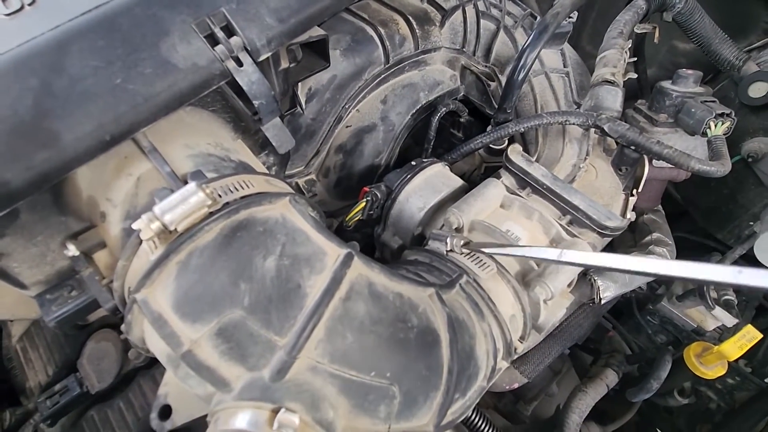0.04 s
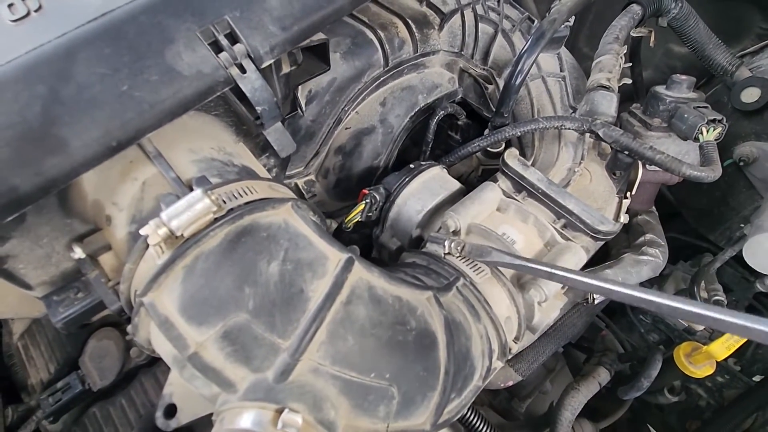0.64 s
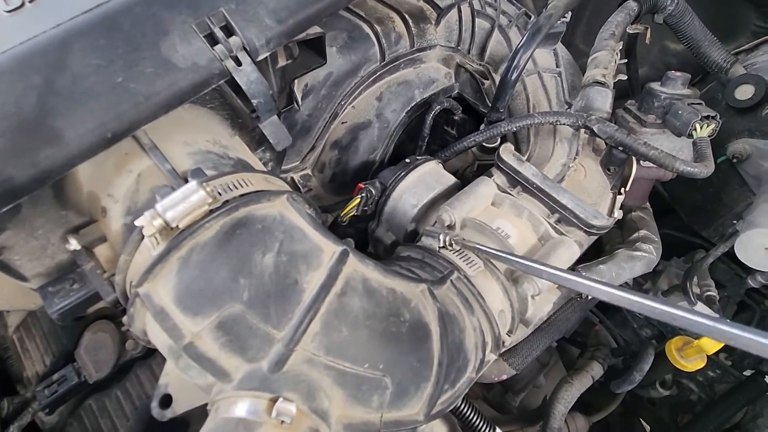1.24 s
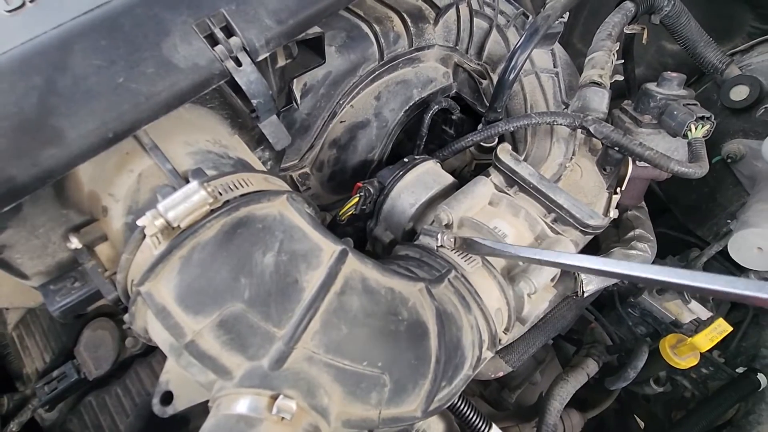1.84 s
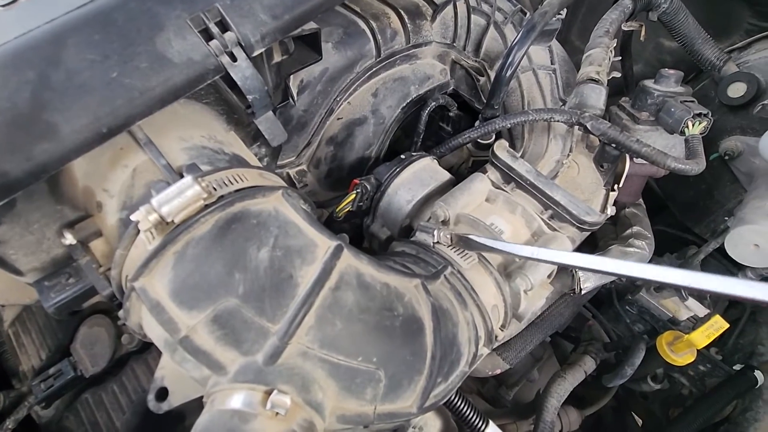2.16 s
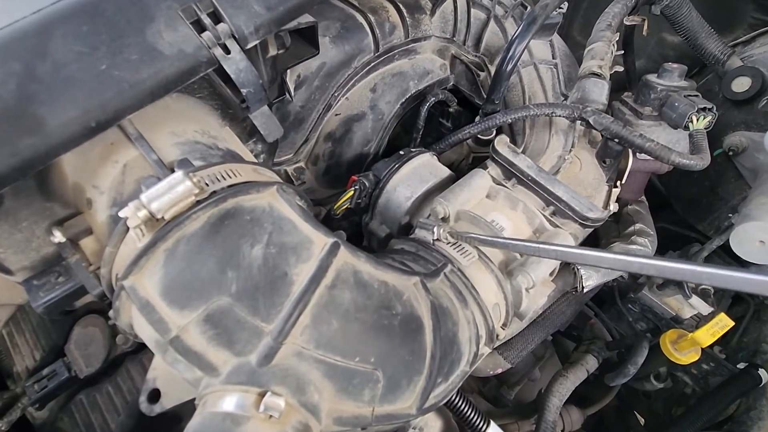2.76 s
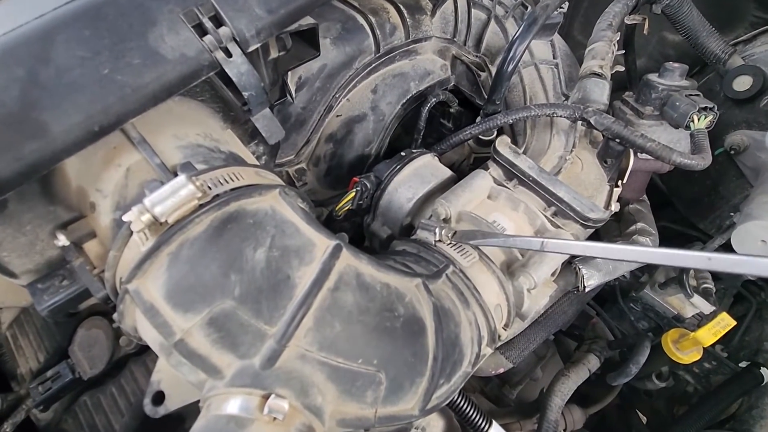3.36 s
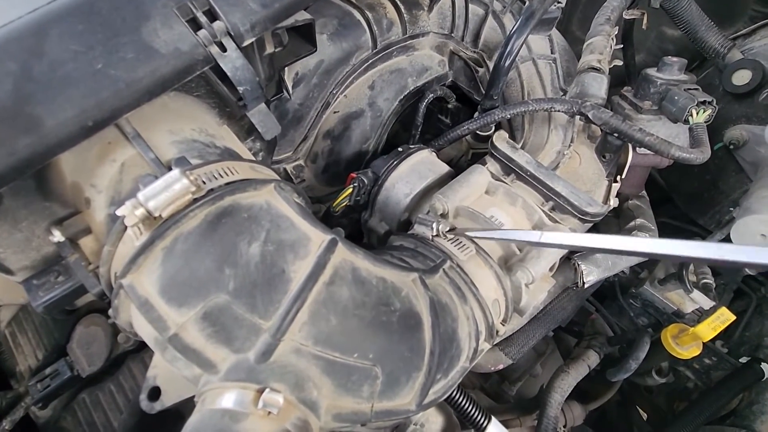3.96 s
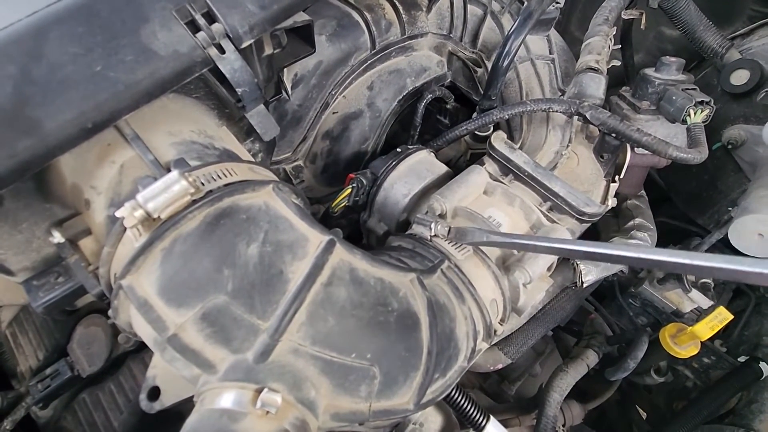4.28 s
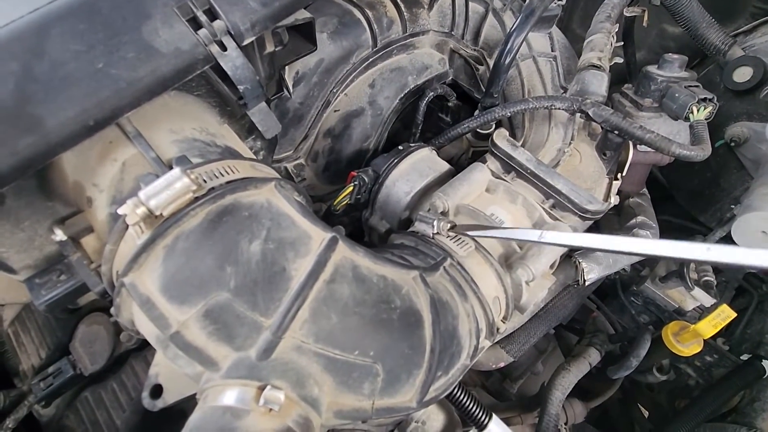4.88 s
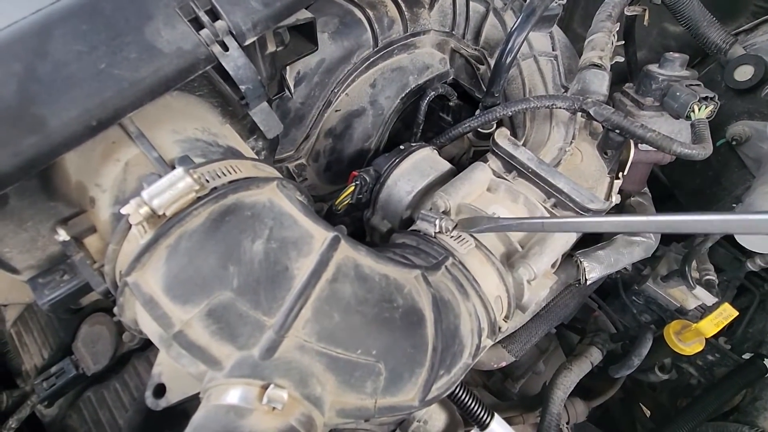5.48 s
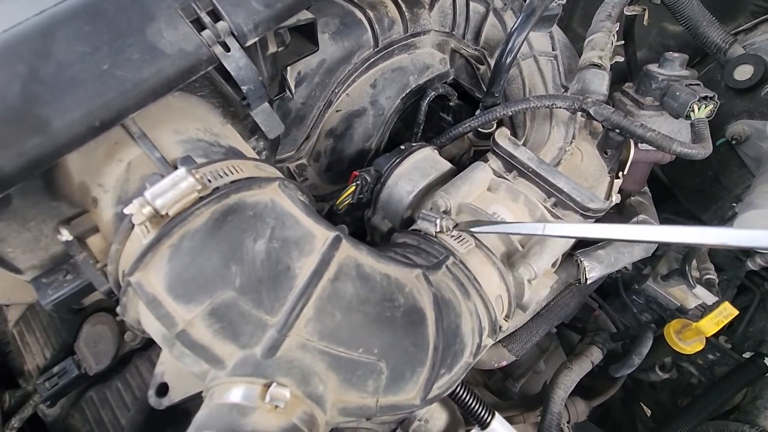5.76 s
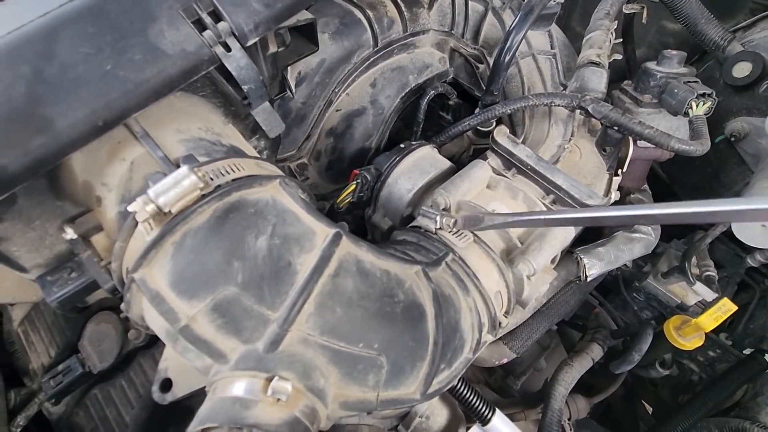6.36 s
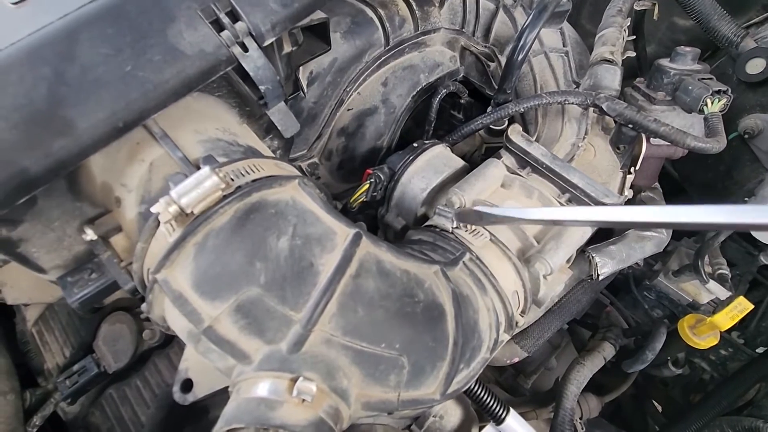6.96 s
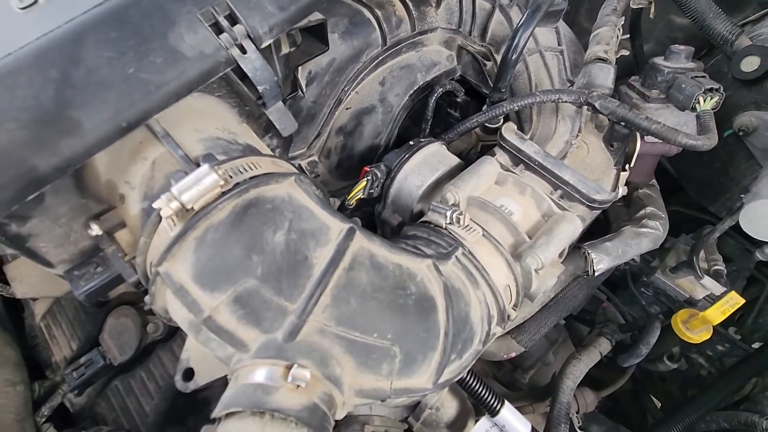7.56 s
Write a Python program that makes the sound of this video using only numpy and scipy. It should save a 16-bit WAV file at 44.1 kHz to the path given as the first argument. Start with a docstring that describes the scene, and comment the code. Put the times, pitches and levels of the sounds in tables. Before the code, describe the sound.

Close up in a garage, a screwdriver blade ticks lightly against a hose clamp screw while fingers shift on the handle. Then it turns the screw in short strokes, each with a sharp steel click and a brief rasp, and the hose and air duct bump dully. The loudest clicks come late, as the blade slips out. A low rumble, a far engine and a dull wash of traffic continue underneath.

```python
"""Sharp clicks and short rasps: a screwdriver turns a steel hose clamp in an engine bay, in a garage.
At each turn the blade clicks into the slot and the screw rasps on the band; between turns the hand
slides to a new grip. Hose and air duct give dull thuds and bumps. At the end the blade skids out.
Underneath: a low rumble, a far engine, a brief faint hum and the dull wash of distant traffic."""
import sys
import numpy as np
from scipy import signal
from scipy.fft import rfft, irfft
from scipy.io import wavfile
from scipy.ndimage import uniform_filter1d

SR = 44100
rng = np.random.default_rng(int(sys.argv[2]) if len(sys.argv) > 2 else 0)


def dump(signal):
    """Clip the signal to [-1, 1] and save it as 16-bit WAV at the path in sys.argv[1]."""
    limited = np.clip(np.atleast_2d(signal).T, -1, 1)
    pcm = np.round(limited * 32767).astype(np.int16)
    wavfile.write(sys.argv[1], SR, pcm)


N = 340893


def gain_of(db):
    """Decibels to amplitude."""
    return 10 ** (np.asarray(db) / 20)


def unit_rms(x):
    """Scale to rms 1."""
    return x / np.sqrt(np.mean(x ** 2) + 1e-20)


def at_hz(points, hz):
    """Interpolate a spectrum on a log-frequency axis."""
    f, value = np.transpose(points)
    return np.interp(np.log(hz + 1), np.log(f + 1), value)


def curves(rows):
    """Each column of a time table, per sample."""
    s, *columns = np.transpose(rows)
    return [np.interp(np.arange(N) / SR, s, c) for c in columns]


def add(mix, start_s, sound):
    """Lay a stereo sound into the mix."""
    part = mix[:, max(round(start_s * SR), 0):][:, :sound.shape[1]]
    part += sound[:, :part.shape[1]]


def wander(shape=(N,), widths=(SR // 20,)):
    """Smooth random field, rms 1; one smoothing width per axis."""
    field = rng.standard_normal(shape)
    for axis, width in enumerate(widths):
        field = uniform_filter1d(uniform_filter1d(field, width, axis), width, axis)
    return unit_rms(field)


def coloured(x, colour, extra_db=0):
    """Minimum-phase filter of unit energy."""
    log_gain = np.log(gain_of(at_hz(colour, np.fft.rfftfreq(2048, 1 / SR)) + extra_db))
    mirrored = np.concatenate([log_gain, log_gain[-2:0:-1]])
    taps = np.fft.ifft(np.exp(np.conj(signal.hilbert(mirrored)))).real
    return signal.oaconvolve(x, taps[None] / np.linalg.norm(taps), axes=1)[:, :x.shape[1]]


def noise(colour, left_lag_ms=0):
    """Steady noise, partly coherent between the two microphone ports."""
    # f/Hz, coherence/0-1
    port_coherence = [(50, .92), (130, .74), (300, .62), (700, .42), (1600, .6), (3000, .3), (15000, .1)]
    hz = np.fft.rfftfreq(N, 1 / SR)
    coherence = at_hz(port_coherence, hz)
    a, b, c, d = rng.standard_normal((4, len(hz)))
    right = a + 1j * b
    left = coherence * right + np.sqrt(1 - coherence ** 2) * (c + 1j * d)
    left *= np.exp(-2j * np.pi * hz * left_lag_ms / 1000)
    return unit_rms(irfft(np.array([left, right]) * gain_of(at_hz(colour, hz)), N))


def ring(modes, t, spread_db):
    """Decaying modes; level and phase vary per strike and port."""
    hz, db, t60_s = np.transpose(modes)[:, :, None]
    amplitude = gain_of(db + spread_db * rng.standard_normal((2, len(modes), 1)))
    phase = rng.random((2, len(modes), 1))
    return (amplitude * gain_of(-60 * t / t60_s) * np.sin(2 * np.pi * (hz * t + phase))).sum(1)


def scatter(t, t60_s, rise_s):
    """A blow smeared by dense reflections, energy 1."""
    burst = rng.standard_normal((2, len(t))) * gain_of(-60 * t / t60_s) * (1 - np.exp(-t / rise_s))
    return burst / np.linalg.norm(burst, axis=1, keepdims=True)


def stroke(t, middle_s, length_s):
    """Envelope: breaks loose quickly, runs evenly, slows to a stop."""
    return np.exp(-abs(2 * (t - middle_s) / length_s) ** np.where(t < middle_s, 4, 3.1))


def far_engine(fifth_db=-10, waver_db=4):
    """A low, throbbing note and its fifth follow the engine speed."""
    # t/s, f/Hz, level/dB
    engine_note = [(1.1, 47.12, -39.5), (1.5, 69.05, -37), (2.1, 55, -35), (2.8, 60.17, -43.5),
                   (3.8, 57.83, -32.5), (4.2, 48.13, -44), (4.72, 48.8, -35), (5.3, 62.26, -30),
                   (6.4, 73.95, -38.5), (7.65, 69.57, -44)]
    hz, db = curves(engine_note)
    phase = 2 * np.pi * np.cumsum(hz) / SR
    note = np.sin(phase) + gain_of(fifth_db) * np.sin(1.5 * phase)
    return gain_of(db) * unit_rms(gain_of(waver_db * wander()) * note)


def rumble(upper_boost_db=3, lump_db=2):
    """Two bands of lumpy rumble plus the far engine, drifting between the ports."""
    # t/s, deep level/dB, upper level before boost/dB
    band_levels = [(0.38, -40.5, -46.5), (1.32, -51.5, -49), (1.7, -49, -46.5), (2.09, -38.5, -45),
                   (2.71, -34.5, -43), (3.75, -35, -41.5), (4.43, -39.5, -45.5), (4.92, -36.5, -47),
                   (5.35, -36.5, -45), (5.92, -43.5, -46), (7.65, -35, -45)]
    # band spectra: f/Hz, level/dB
    deep_colour = [(10, -22), (25, -9), (38, -0.5), (52, -1.5), (78, 1), (95, -17.5), (140, -15),
                   (400, -83)]
    upper_colour = [(55, -17), (85, 0.5), (110, 3.5), (135, -4), (200, -15), (260, -18.5), (400, -40),
                    (1200, -79.5)]
    # t/s, left minus right/dB
    pan = [(1.2, 1), (3.3, -6.5), (4.65, -0.5), (6.7, -0.5), (7.2, -3.5)]
    deep_db, upper_db = curves(band_levels)
    side_db, = curves(pan)
    lumps = gain_of(lump_db * wander())
    deep = gain_of(deep_db) * noise(deep_colour)
    upper = gain_of(upper_db + upper_boost_db) * noise(upper_colour)
    return (lumps * (deep + upper) + far_engine()) * gain_of([side_db / 2, -side_db / 2])


def traffic():
    """Distant traffic: a dull wash, and tyre hiss that slowly swells and fades."""
    # t/s, wash level/dB, tyre level/dB
    levels = [(0.0, -52, -61.5), (1.65, -53, -65.5), (3.0, -50.5, -54.5), (4.65, -49.5, -55),
              (6.15, -51, -63), (7.65, -50.5, -64.5)]
    # spectra: f/Hz, level/dB
    wash_colour = [(120, -10), (250, -1), (320, 1), (470, -4.5), (545, 3), (615, -2.5), (700, 2), (950, -3),
                   (1300, -5.5), (1800, -15), (2600, -37), (4500, -42), (7500, -62)]
    tyre_colour = [(600, -10), (1100, -5), (1450, 7), (1800, 4), (2100, -5.5), (2600, -14.5), (3500, -22.5),
                   (6000, -59.5)]
    wash_db, tyre_db = curves(levels)
    wash = gain_of(wash_db) * noise(wash_colour, left_lag_ms=0.287)
    return wash + gain_of(tyre_db) * noise(tyre_colour, left_lag_ms=0.455)


def hum(pitch_hz=238, rise_hz_per_s=26, level_db=-56, middle_s=5.85, sigma_s=0.37):
    """A faint, wavering hum climbs as it swells and fades."""
    t = np.arange(N) / SR - middle_s
    tone = np.sin(2 * np.pi * np.cumsum(pitch_hz + rise_hz_per_s * t) / SR) * gain_of(2 * wander())
    return gain_of(level_db) * np.exp(-.5 * (t / sigma_s) ** 2) * unit_rms(tone)


def garage(x, t60_s=0.28, wet_db=-15):
    """Add a faint, short tail from bonnet and walls."""
    # f/Hz, level/dB
    tail_colour = [(200, 35.5), (4500, -35.5), (9000, -7.5), (16000, 1.0)]
    t = np.arange(SR // 2) / SR
    tail = coloured(scatter(t, t60_s, rise_s=0.0019), tail_colour)
    return x + gain_of(wet_db) * signal.fftconvolve(x, tail, axes=1)[:, :N]


def hose(rise_cycles=1.67, rough_rad=0.34):
    """The hand pushes on the rubber hose: a low thud of a few cycles."""
    # t/s, peak level/dB, f/Hz
    thuds = [(3.262, -29.5, 57), (3.501, -33, 190), (4.547, -30, 129.6), (5.964, -30.5, 115),
             (6.45, -24, 113.5), (7.349, -29, 100.5)]
    t, out = np.arange(SR // 4) / SR, np.zeros((2, N))
    for s, db, hz in thuds:
        age = t * hz / rise_cycles
        phase = 2 * np.pi * (hz * t + rng.random()) + rough_rad * wander(t.shape, (100,))
        thud = np.sin(phase) * (age * np.exp(1 - age)) ** 2
        add(out, s, gain_of(db) * thud * np.ones((2, 1)))
    return out


def duct(gain_db=-7, rise_s=0.0008):
    """The tool bumps the hollow plastic air duct: a short, dull note."""
    # t/s, relative level/dB
    bumps = [(0.127, -33), (4.104, -41), (5.081, -45), (5.298, -40.5), (5.961, -39), (6.436, -34.5),
             (6.465, -40.5), (6.484, -36.5)]
    # f/Hz, level/dB, t60/s
    modes = [(185, -1, 0.041), (406, -0.5, 0.12), (530, 3, 0.072), (660, 2, 0.046), (1057, -2.5, 0.039),
             (1655, -3.5, 0.034), (2150, -6, 0.023)]
    t, out = np.arange(SR // 5) / SR, np.zeros((2, N))
    for s, db in bumps:
        note = ring(modes, t, spread_db=1.5)
        add(out, s, gain_of(db + gain_db) * (note[0] + .5 * note) * (1 - np.exp(-t / rise_s)))
    return out


def creaks(rough_rad=0.53):
    """The screw sticks and slips on the band: brief, rough squeaks."""
    # middle t/s, length/s, level/dB
    squeaks = [(4.088, 0.02, -46.5), (5.072, 0.022, -47.5), (5.514, .018, -51)]
    # f/Hz, level/dB
    partials = [(705, -4), (2865, -14.5), (4410, -22)]
    t = np.arange(N) / SR
    envelope = sum(gain_of(db) * stroke(t, middle_s, length_s) for middle_s, length_s, db in squeaks)
    tones = sum(gain_of(db) * np.sin(2 * np.pi * hz * t + rough_rad * wander((2, N), (1, 100)))
                for hz, db in partials)
    return envelope * unit_rms(tones)


def friction(colour, slips_per_s, spread_db, hiss_gain):
    """Tiny slips over a smooth hiss; the colour shifts as the contact moves."""
    sizes = gain_of(spread_db * np.minimum(rng.exponential(1, N), 4))
    slips = sizes * (rng.random(N) < slips_per_s / SR) * rng.standard_normal((2, N))
    rub = coloured(unit_rms(slips) + hiss_gain * rng.standard_normal((2, N)), colour)
    spectra = signal.stft(rub, nperseg=512)[2]
    contact_db = 3.3 * wander(spectra.shape[1:], (3, 12))
    grip_db = 1.7 * wander(spectra.shape[2:], (3,))
    return unit_rms(signal.istft(spectra * gain_of(contact_db + grip_db))[1][:, :N])


def twisting(bite_s=0.014, turn_fade_db=-9.5, release_s=.012, turn_hiss_db=2,
             rest_db=-77.5, rest_waver_db=3, lift_s=6.82, lift_fade_s=0.034):
    """Fingers hiss round the handle, the screw rasps along the band; stroke powers add."""
    # screw turns: start t/s, length/s, rasp level/dB
    turns = [(2.727, .17, -55.5), (3.376, 0.13, -53.5), (3.866, 0.066, -51.5), (4.07, 0.078, -59.5),
             (4.344, 0.11, -55.5), (5.275, 0.085, -51.5), (5.741, 0.13, -52), (6.183, 0.18, -56.5),
             (6.39, 0.12, -48)]
    # regrips, blade dragging in the slot: middle t/s, length/s, hiss level/dB, rasp re hiss/dB
    slides = [(0.028, 0.11, -60, 2), (0.202, 0.13, -63, -2), (0.286, 0.061, -58.5, -19),
              (0.457, 0.073, -48.5, -13), (0.665, 0.14, -70.5, 8), (0.702, 0.06, -52, -2),
              (1.037, 0.088, -46, -16), (1.156, 0.19, -55, -10), (1.464, 0.08, -58, 1),
              (1.494, 0.31, -66, 2), (1.654, 0.031, -59.5, -4), (1.77, 0.19, -66, -12),
              (1.922, 0.024, -60.5, -29), (2.148, 0.058, -53, -8), (2.438, 0.12, -60.5, -19),
              (2.569, 0.045, -61, -16), (2.632, 0.029, -67, -22), (3.008, 0.035, -52.5, -19),
              (3.094, 0.17, -66.5, -6), (3.622, 0.084, -66, -6), (3.743, 0.14, -70, -16),
              (4.007, 0.12, -62.5, -3), (4.177, 0.19, -61.5, -19), (4.521, 0.079, -54.5, -13),
              (4.749, 0.11, -58, -9), (4.885, 0.063, -53.5, -2), (5.068, 0.12, -61.5, -9),
              (5.163, 0.067, -58.5, -14), (5.428, 0.13, -65, -15), (5.658, 0.033, -62.5, -22),
              (5.99, 0.21, -65, -11), (6.48, 0.031, -46.5, 0), (6.583, 0.038, -55.5, -6),
              (7.322, 0.18, -69.5, -7.5)]
    # friction spectra: f/Hz, level/dB
    finger_colour = [(1500, -35), (5000, -19), (8000, -13), (9800, -9), (11000, -3), (12700, 0),
                     (15800, -1)]
    thread_colour = [(700, -21), (2200, -3.5), (2900, -1), (4000, 3.5), (5300, -3.5), (6600, -6.5),
                     (7800, -20), (12000, -42.5)]
    t = np.arange(N) / SR
    # the resting tool rubs faintly until lifted off
    touching = .5 - .5 * np.tanh((t - lift_s) / lift_fade_s)
    resting = touching * gain_of(rest_db + rest_waver_db * wander())
    hiss_power, rasp_power = resting ** 2, resting ** 2
    for start_s, length_s, db in turns:
        age_s = np.maximum(t - start_s, 0)
        # fades as the wrist runs out of travel
        turn = np.minimum(age_s / bite_s, 1) * gain_of(db + turn_fade_db * age_s / length_s)
        turn *= np.exp(-np.maximum(age_s - length_s, 0) / release_s)
        hiss_power += (gain_of(turn_hiss_db) * turn) ** 2
        rasp_power += turn ** 2
    for middle_s, length_s, db, rasp_db in slides:
        slide = gain_of(db) * stroke(t, middle_s, length_s)
        hiss_power += slide ** 2
        rasp_power += (gain_of(rasp_db) * slide) ** 2
    fingers = friction(finger_colour, slips_per_s=2500, spread_db=5, hiss_gain=1.8)
    thread = friction(thread_colour, slips_per_s=1500, spread_db=2.5, hiss_gain=1.4)
    return np.sqrt(hiss_power) * fingers + np.sqrt(rasp_power) * thread


def blade(contact_s=.0004, crack_db=4.5, ring_db=-38, ping_t60_s=0.032, ping_detune=.045,
          usual_click_db=-26, usual_treble_db=-15, knock_db=-17, knock_growth=0.32, right_lag_ms=.3):
    """The blade strikes the screw head: a tick with close reflections, a steel ping, a hose knock."""
    # t/s, level/dB, treble/dB, ping f/Hz, ping re level/dB
    clicks = [(0.0592, -29, -20, 6140, -2.5), (0.2096, -33.5, -19, 3530, 2.5), (0.602, -33, -28.5, 6150, 0),
              (1.4378, -29.5, -34, 5400, -1), (1.779, -46, -9, 10850, 9), (2.09, -39.5, -29, 4300, -10),
              (2.115, -40.5, -22, 4300, 3), (2.7372, -27.5, -27, 3720, 9.5), (2.7421, -24.5, -25, 5300, 6),
              (2.8108, -20.5, -15, 4280, -12), (3.391, -26, -17, 1690, -13), (3.402, -28, -12, 3500, -9),
              (3.632, -39, -13, 4400, -8), (3.8763, -27.5, -40, 2350, 10), (3.948, -39, 4, 11400, -10),
              (4.007, -26.5, -25, 4150, -3), (4.102, -23, -22, 7050, 0.5), (4.1068, -29, -22, 3700, 6.5),
              (4.3556, -25, -27, 4500, -3), (4.3604, -14, -11.5, 4350, -16), (4.4761, -34.5, -45, 4220, 0),
              (4.8162, -28, -25, 2502, 4.5), (4.8257, -28.5, -23, 4180, -6), (5.0886, -19, -14.5, 1490, -2),
              (5.2777, -21.5, -18, 4600, -25), (5.2975, -24, -22, 3800, -3), (5.508, -35, -15, 4330, -1),
              (5.754, -22, -21, 3950, -14), (5.9598, -22, -27, 2440, -5), (6.218, -15.5, -17.5, 2360, -4.5),
              (6.2969, -21.5, -3, 12120, 2), (6.307, -28, -6, 1400, 7.5), (6.413, -24, -24, 3700, -4),
              (6.4249, -14, -15, 5150, -10), (6.4402, -23, -20, 6600, -8), (6.464, -10, -8, 10340, -0.5),
              (6.4689, -16, -13, 1800, -5), (6.482, -10.5, -11.5, 4497, 1), (6.4911, -12, -9.5, 4310, 3),
              (6.4935, -14, -11.5, 3170, 0), (6.6555, -30, -21.5, 4250, -9)]
    # ring of clamp and shaft: f/Hz, level/dB, t60/s
    steel_modes = [(2220, -5, .07), (3950, -4, .04), (4095, -3, .04), (4400, 0, .05), (4550, -3, .04),
                   (10340, -3, .04)]
    # spectra of steel on steel and of the hose knock: f/Hz, level/dB
    click_colour = [(150, -25), (600, -11), (1200, -3), (2300, -2), (2800, -5), (4250, 3), (6200, -4),
                    (7100, -1), (8000, -6), (11300, 0), (13500, -3), (15800, -4)]
    knock_colour = [(100, 13), (300, 3), (1400, 3.5), (2300, -5), (3200, -11.5), (8000, -40)]
    t, out = np.arange(SR // 8) / SR, np.zeros((2, N))
    hz = np.fft.rfftfreq(2048, 1 / SR)
    treble_shelf = np.clip(np.log2((hz + 1) / 5000), 0, 1)
    for s, db, treble_db, ping_hz, ping_db in clicks:
        crack = scatter(t, t60_s=.012, rise_s=contact_s)
        crack += gain_of(ring_db) * ring(steel_modes, t, spread_db=4)
        crack += gain_of(-8) * scatter(t, t60_s=.065, rise_s=contact_s)
        # each seating shifts the colour and lets one cluster of close modes sing
        seat_db = 2 * wander(hz.shape, (14,))
        cluster = [(ping_hz * (1 + ping_detune * k), -6 * abs(k), ping_t60_s) for k in (-1, 0, 1)]
        ping = ring(cluster, t, spread_db=1) * (1 - np.exp(-t / contact_s))
        ping *= gain_of(db + ping_db) / np.linalg.norm(ping[0])
        # harder contact, more treble
        hardness_db = treble_shelf * (treble_db - usual_treble_db)
        tick = gain_of(db + crack_db) * coloured(crack, click_colour, seat_db + hardness_db)
        # the soft hose yields, so its knock grows more slowly than the click
        knock = coloured(scatter(t, t60_s=0.11, rise_s=contact_s), knock_colour)
        knock *= gain_of(knock_db + knock_growth * (db - usual_click_db))
        add(out, s, tick + ping + knock)
    out[1] = np.roll(out[1], round(right_lag_ms * 1e-3 * SR))  # left port is nearer
    return out


def scene():
    """Tool sounds in the garage over the background."""
    return garage(blade() + duct() + creaks()) + hose() + twisting() + rumble() + traffic() + hum()


def record(dry, cutoff_hz=15900):
    """The left port hears more treble; both are low-passed."""
    # f/Hz, left minus right/dB
    balance = [(280, 0), (550, 1), (1300, -1.3), (2400, .3), (4800, 0), (8000, 7), (15000, 6)]
    side_db = at_hz(balance, np.fft.rfftfreq(N, 1 / SR))
    ports = gain_of([side_db / 2, -side_db / 2])
    heard = irfft(rfft(dry) * ports / np.sqrt((ports ** 2).mean(0)), N)
    lowpass = signal.firwin(401, cutoff_hz, window=("kaiser", 8), fs=SR)
    return signal.oaconvolve(heard, lowpass[None], "same")


dry = scene()
out = record(dry)
dump(out)
```